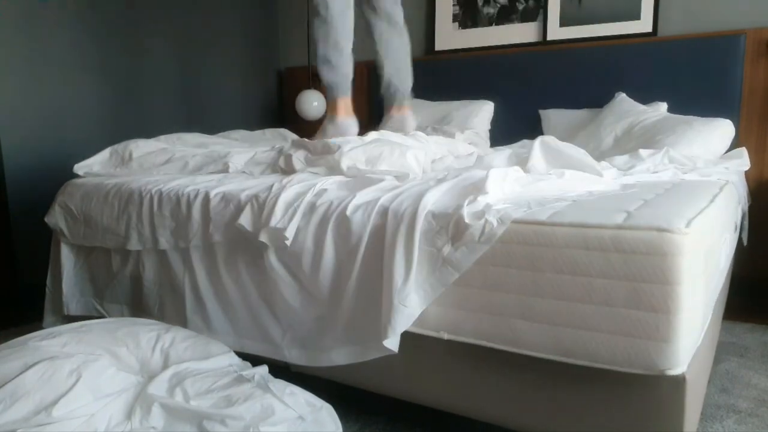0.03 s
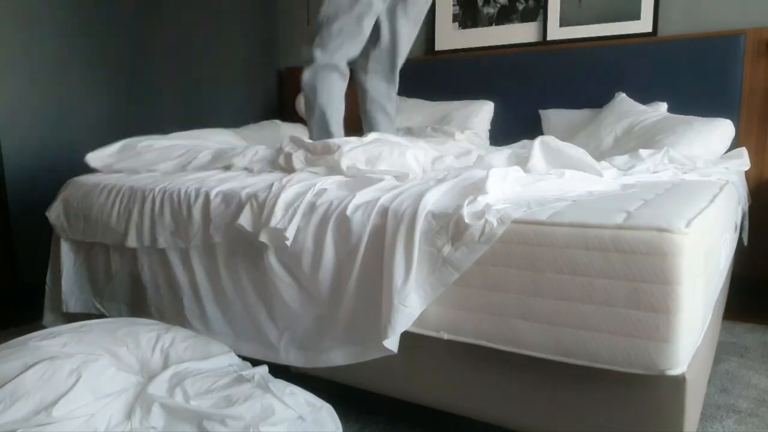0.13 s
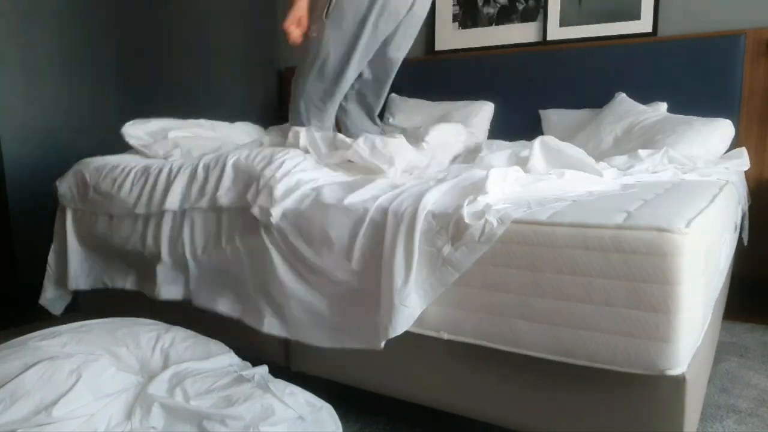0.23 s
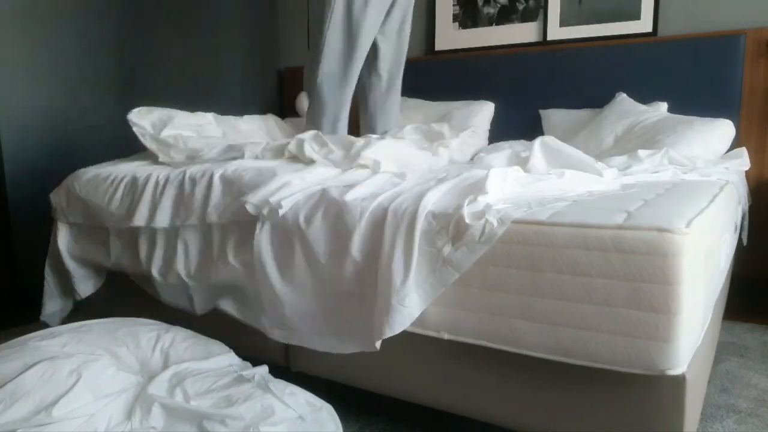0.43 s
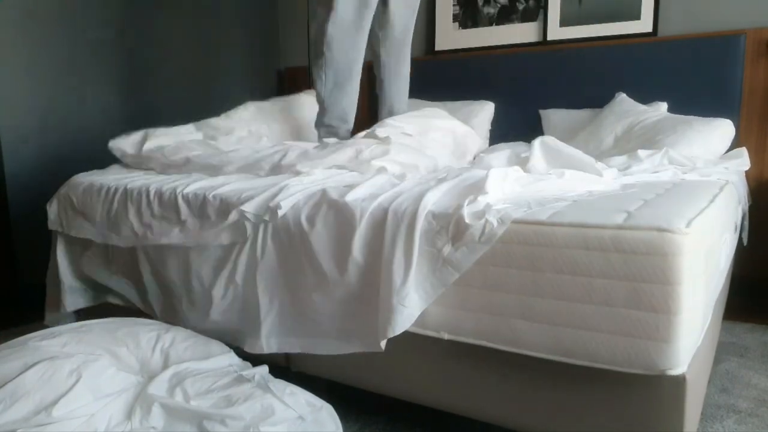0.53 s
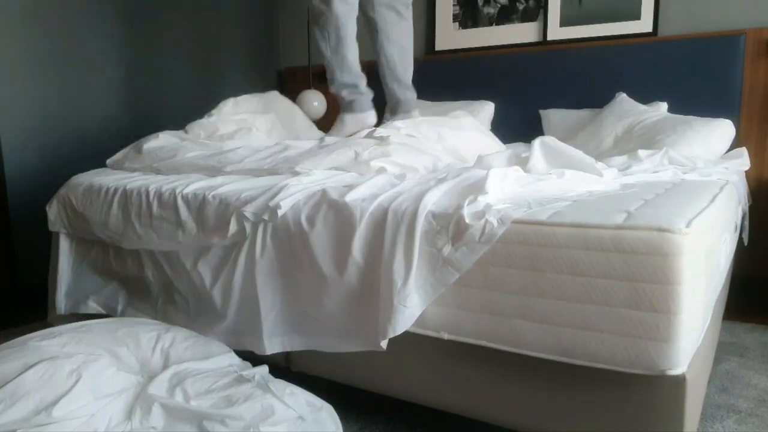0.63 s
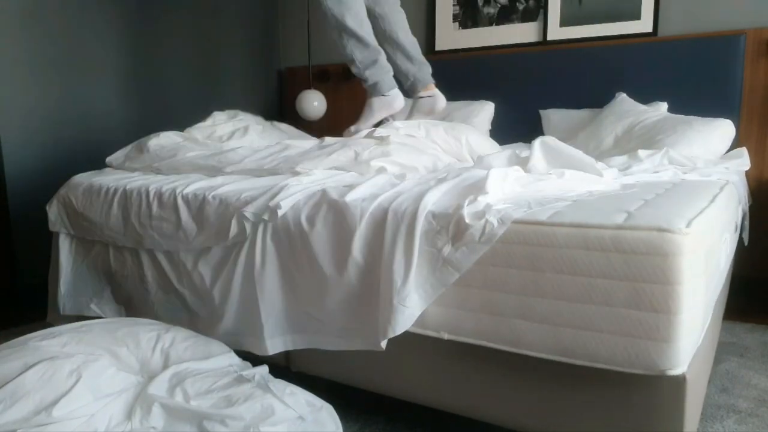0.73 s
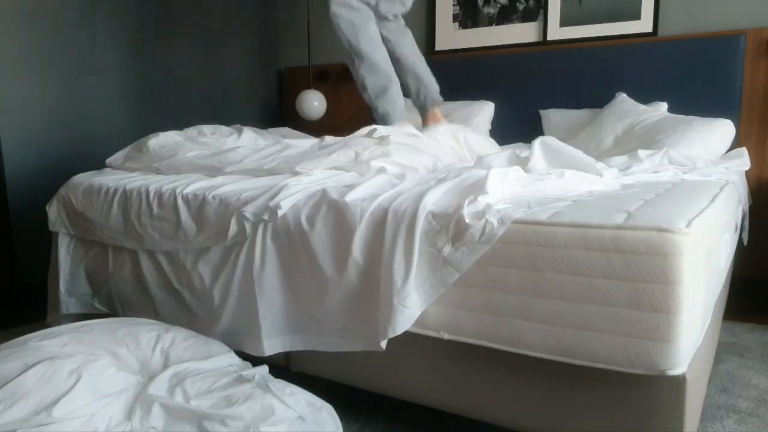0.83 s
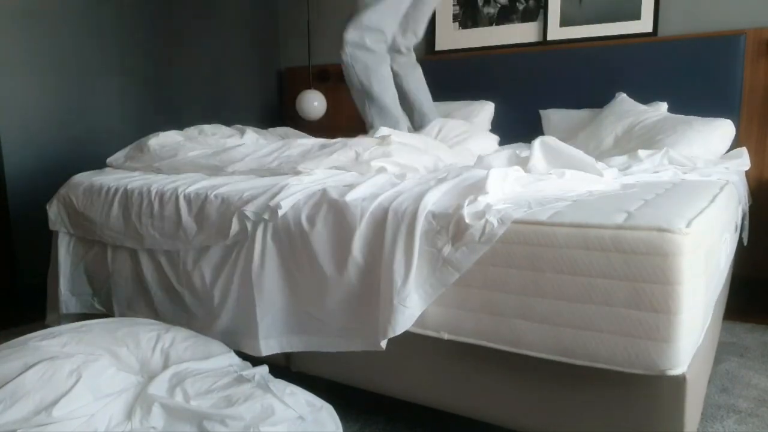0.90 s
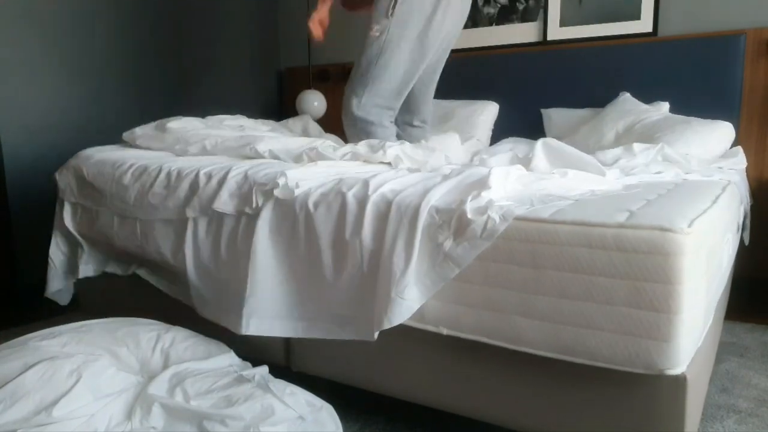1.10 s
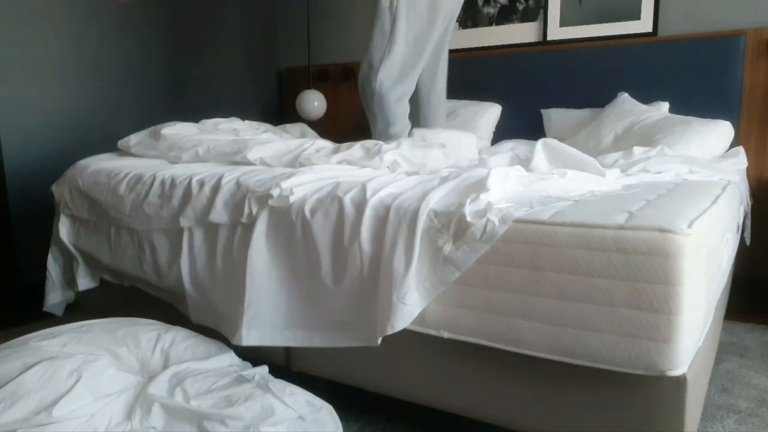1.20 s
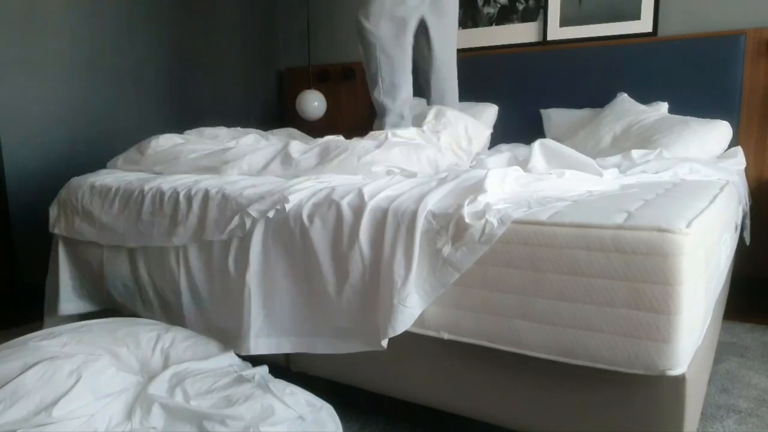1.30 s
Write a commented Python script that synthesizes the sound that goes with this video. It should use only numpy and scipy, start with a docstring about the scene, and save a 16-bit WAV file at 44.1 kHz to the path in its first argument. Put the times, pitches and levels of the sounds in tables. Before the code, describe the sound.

Feet thump on a mattress in a hotel room. A hard first landing slaps the bedding and knocks the bed frame, then a lighter push-off and a softer landing follow. Sheets and trousers rustle over a steady hiss.

```python
"""Hotel room: someone jumps on the bed. A hard landing, a push-off, a softer landing that sinks in.
Each load booms the bed base in two beating low modes, rumbles the mattress and hums its springs.
The first landing also slaps the bedding and rings the frame.
Sheets and trousers rustle over a steady hiss."""
import sys
import numpy as np
from scipy import signal
from scipy.fft import rfft, irfft
from scipy.io import wavfile

SR = 44100
rng = np.random.default_rng(int(sys.argv[2]) if len(sys.argv) > 2 else 0)


def put_to_file(sound):
    """Save the sound as 16-bit audio at rate SR, in the file named by the first command-line argument."""
    columns = np.atleast_2d(sound).T  # one column per channel
    safe = np.clip(columns, -1, 1)
    whole_steps = np.round(safe * 32767)
    wavfile.write(sys.argv[1], SR, whole_steps.astype(np.int16))


N = 59535
TIME_S = np.arange(N) / SR
FREQ_HZ = np.fft.rfftfreq(N, 1 / SR)

# Left-right likeness of the sound field: freq_hz, coherence
COHERENCE = [(20, 0.67), (90, 0.93), (160, 0.81), (300, 0.9), (640, 0.24), (1200, 0), (16000, 0.12)]


def amp(db):
    """Decibels to gain."""
    return 10 ** (np.asarray(db) / 20)


def unit_rms(x):
    """Scale to an rms of one."""
    return x / np.sqrt(np.mean(x ** 2) + 1e-20)


def lookup(table, hz, column=1):
    """Interpolate a table column over log frequency."""
    rows = np.array(table)
    return np.interp(np.log(hz + 1), np.log(rows[:, 0] + 1), rows[:, column])


def colour(white, spectrum):
    """Shape two noises to a spectrum at unit rms: alike in the bass, unrelated in the treble."""
    a, b = rfft(white)
    coherence = lookup(COHERENCE, FREQ_HZ)
    mid, side = a * np.sqrt(1 + coherence), b * np.sqrt(1 - coherence)
    stereo = np.array([mid + side, mid - side])
    return unit_rms(irfft(stereo * amp(lookup(spectrum, FREQ_HZ)), N))


def noise(spectrum):
    """Smooth stereo noise."""
    return colour(rng.standard_normal((2, N)), spectrum)


def crinkle(spectrum):
    """Cloth noise: smooth rubbing plus tiny snaps of creases."""
    snaps_per_s, spread_db, snap_share = 2200, 3, 0.47
    size = amp(spread_db * np.minimum(rng.exponential(1, (2, N)), 4))
    snaps = size * rng.choice([-1, 1], (2, N)) * (rng.random((2, N)) < snaps_per_s / SR)
    rubbing = rng.standard_normal((2, N))
    return colour(np.sqrt(snap_share) * unit_rms(snaps) + np.sqrt(1 - snap_share) * rubbing, spectrum)


def envelope(peak_s, rise_s, hold_s, t60_s):
    """Swell 20 dB per rise time, hold, decay."""
    rise_db = -20 * np.maximum(peak_s - TIME_S, 0) / rise_s
    decay_db = -60 * np.maximum(TIME_S - peak_s - hold_s, 0) / t60_s
    return amp(rise_db + decay_db)


def stroke(peak_s, sigma_s):
    """Bell-shaped level of one cloth movement."""
    return np.exp(-0.5 * ((TIME_S - peak_s) / sigma_s) ** 2)


def mode_tone(hz):
    """One mode at both microphones; lower coherence, wider phase gap."""
    diffuse_share = 0.79
    gap_rad = diffuse_share * np.arccos(lookup(COHERENCE, hz))
    phase_rad = 2 * np.pi * (hz * TIME_S + rng.random())
    return np.sqrt(2) * np.cos(phase_rad + gap_rad * np.array([[0.5], [-0.5]]))


def mattress():
    """Each load booms the base, rumbles the filling and sets the springs humming."""
    # Loads on the bed: peak_s, rise_s, hold_s, t60_s, boom_db, rumble_db, spring_db
    loads = [(.253, .036, 0.009, 0.37, -22.5, -38, -34.5), (.388, 0.044, 0.035, .33, -49.5, -43.5, -52),
             (0.66, 0.068, 0.0036, 0.41, -39, -47, -93), (.708, 0.067, 0.055, 0.3, -47, -50.5, -61),
             (1.058, 0.061, 0.046, 0.17, -36, -38.5, -42), (1.15, 0.09, 0.08, 0.31, -37, -43.5, -47)]
    # Low modes of the base: pitch_hz, relative_db
    base_modes = [(65, -4.5), (90, -3)]
    # Squeezed filling: freq_hz, relative_db
    rumble_spectrum = [(20, -24), (40, 2), (60, 3.5), (115, 4.5), (170, -6.5), (240, -3), (380, -6),
                       (600, -10), (1000, -16.5), (1800, -20.5), (4000, -33), (16000, -59)]
    spring_hz, spring_max_hold_s, spring_t60_s = 283, 0.025, 0.24
    rumble, spring = noise(rumble_spectrum), mode_tone(spring_hz)
    out = np.zeros((2, N))
    for peak_s, rise_s, hold_s, t60_s, boom_db, rumble_db, spring_db in loads:
        age_s = TIME_S - peak_s
        contact = np.clip(age_s / rise_s + 2, 0, 1) ** 2
        weight = envelope(peak_s, rise_s, hold_s, t60_s)
        boom = sum(amp(db) * np.sqrt(2) * np.cos(2 * np.pi * hz * age_s) for hz, db in base_modes)
        hum = spring * envelope(peak_s, rise_s, min(hold_s, spring_max_hold_s), spring_t60_s)
        out += contact * weight * (amp(boom_db) * boom + amp(rumble_db) * rumble)
        out += contact * amp(spring_db) * hum
    return out


def bedding_slap():
    """Both feet smack the bedding; each band decays in the room at its own rate."""
    # Slap bands: centre_hz, relative_db, t60_s
    bands = [(60.4, -4, 0.62), (136, -7, 0.95), (185, -1.5, 0.35), (310, -2.5, 0.46), (520, -0.5, 0.35),
             (810, -4.5, 0.41), (1280, -2, 0.24), (1804, -14, 0.38), (2580, -16.5, 0.52),
             (4430, -26.5, 0.88), (6500, -30.5, 0.23), (16000, -48, 0.3)]
    peak_s, rise_s, hold_s, level_db = 0.2346, 0.023, 0.021, -24
    treble_lag_s = 0.004  # highs build as the soles flatten the sheet
    spectrum = rfft(noise(bands))
    log_centres = np.log([row[0] for row in bands])
    out = np.zeros((2, N))
    for (hz, _, t60_s), selector in zip(bands, np.eye(len(bands))):
        power_share = np.interp(np.log(FREQ_HZ + 1), log_centres, selector)
        band = irfft(spectrum * np.sqrt(power_share), N)
        lag_s = treble_lag_s * min(hz / 1700, 1)
        out += band * envelope(peak_s + lag_s, rise_s, hold_s - lag_s, t60_s)
    return amp(level_db) * out


def frame_ring():
    """The hard landing knocks the frame into a short hollow ring."""
    # Frame modes: pitch_hz, relative_db, t60_s
    modes = [(195, -8, 0.18), (372.6, -11.5, 0.44), (420, -10, 0.55), (479.7, -10, 0.44), (526, -8, 0.23),
             (659, 0.5, 0.25), (703, -9, 0.29), (776.5, -3.5, 0.28), (844, -7.5, 0.31), (981, -6.5, 0.25),
             (1113, -10.5, 0.31), (1252, -10, .27), (1413, -16, 0.33), (1497, -17, 0.36)]
    peak_s, rise_s, hold_s, level_db = 0.2308, 0.012, 0.0044, -23.5
    return sum(amp(level_db + db) * mode_tone(hz) * envelope(peak_s, rise_s, hold_s, t60_s)
               for hz, db, t60_s in modes)


def sheets():
    """Sheets rustle and fizz as the feet drag them; overlapping drags add in power."""
    # Drags: peak_s, sigma_s, rustle_db, fizz_db
    drags = [(.02, .07, -54, -50), (.18, 0.07, -53, -52), (0.346, 0.042, -41, -47), (.42, 0.048, -45, -51),
             (.59, 0.064, -47.5, -61), (.7, 0.074, -49, -56), (1.1, 0.094, -44.5, -63),
             (1.21, 0.076, -44, -48.5)]
    # Midrange rustle: freq_hz, relative_db
    rustle_spectrum = [(200, 5.5), (700, 6.5), (1700, 3), (3000, -2), (4500, -2), (7000, -20), (16000, -16)]
    # Treble fizz: freq_hz, relative_db
    fizz_spectrum = [(2000, -7.5), (6000, 0.5), (9000, -4), (12000, -2.5), (16000, -7)]
    rustle_power, fizz_power = np.zeros((2, N))
    for peak_s, sigma_s, rustle_db, fizz_db in drags:
        motion = stroke(peak_s, sigma_s)
        rustle_power += (amp(rustle_db) * motion) ** 2
        fizz_power += (amp(fizz_db) * motion) ** 2
    rustle = np.sqrt(rustle_power) * crinkle(rustle_spectrum)
    fizz = np.sqrt(fizz_power) * crinkle(fizz_spectrum)
    return rustle + fizz


def trousers():
    """Trouser legs brush in the air, each swish strongest at one frequency."""
    # Swishes: peak_s, sigma_s, level_db, strongest_hz
    swishes = [(0.036, 0.045, -50, 3230), (0.169, 0.042, -47.5, 3400), (.39, .04, -47.5, 3470)]
    # Swish spectrum: ratio_to_strongest, relative_db
    shape = [(.4, -64), (.8, -12), (.93, -11), (1, -2.5), (1.08, -6.5), (1.42, -12.5), (2, -15), (4.5, -30)]
    out = np.zeros((2, N))
    for peak_s, sigma_s, level_db, strongest_hz in swishes:
        spectrum = [(strongest_hz * ratio, db) for ratio, db in shape]
        out += amp(level_db) * stroke(peak_s, sigma_s) * crinkle(spectrum)
    return out


def hiss():
    """Steady broadband background, raised in the bass."""
    # Noise floor: freq_hz, relative_db
    spectrum = [(20, -1), (60, 12), (150, 6.5), (400, -1.5), (900, 2), (1800, 0), (3800, -1), (5200, -2),
                (7000, -6), (11500, -7), (16000, -10.5)]
    return amp(db=-48) * noise(spectrum)


def scene():
    """Bed, cloth and background hiss."""
    return mattress() + bedding_slap() + frame_ring() + sheets() + trousers() + hiss()


def record(dry):
    """Colour of each microphone, then the band limit."""
    # Microphone response: freq_hz, left_db, right_db
    response = [(19.8, -0.5, -0.5), (487, 1, 0.5), (1170, -4, -0.5), (2250, -1, -1), (4870, 1.5, 1.5),
                (6050, -4, 0), (7040, -7.5, -4), (7400, -7, -19), (8140, -1.5, -14), (9100, -1, -13.5),
                (11600, 0, -7.5), (14000, -5, -12.5), (15800, -12, -17)]
    cutoff_hz = 15750
    gains = amp([lookup(response, FREQ_HZ, column=1), lookup(response, FREQ_HZ, column=2)])
    coloured = irfft(rfft(dry) * gains, N)
    lowpass = signal.firwin(511, cutoff_hz, window=("kaiser", 9), fs=SR)
    return signal.oaconvolve(coloured, lowpass[None], "same")


dry = scene()
out = record(dry)
put_to_file(out)
```